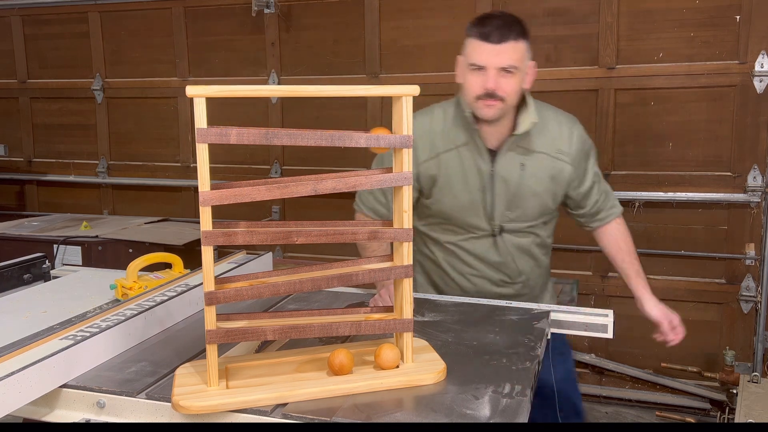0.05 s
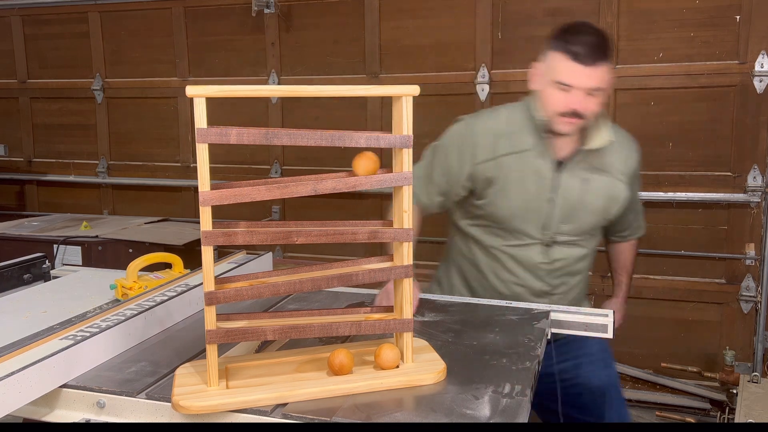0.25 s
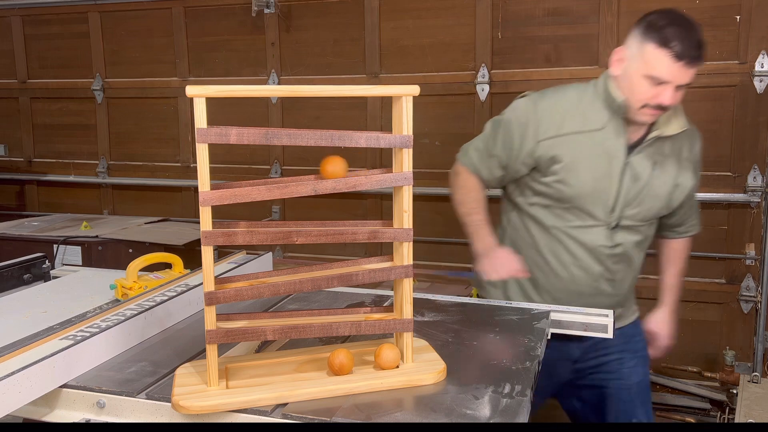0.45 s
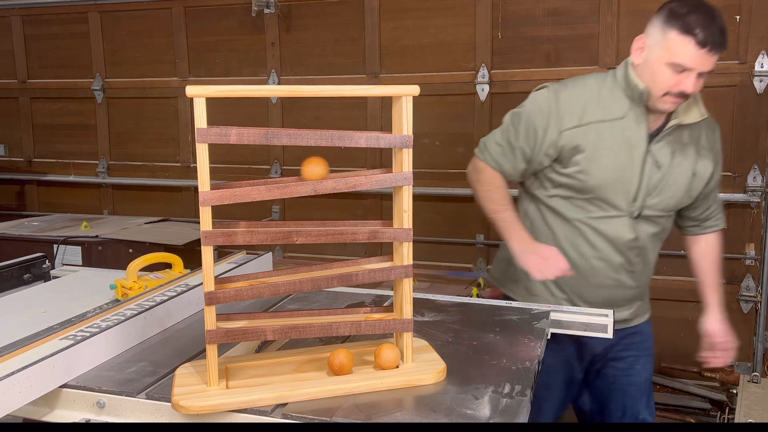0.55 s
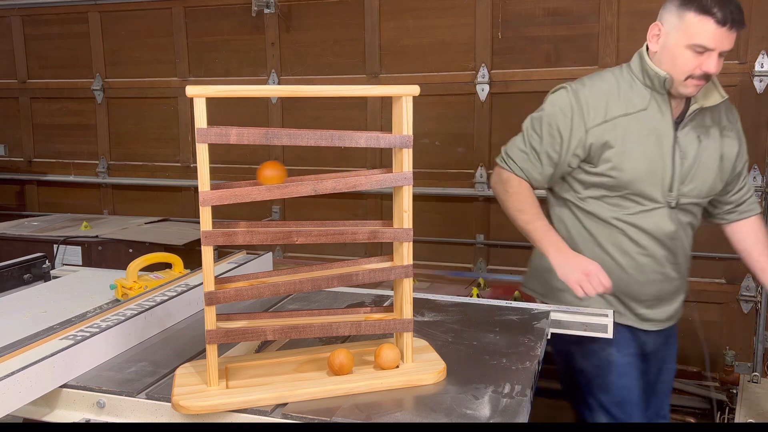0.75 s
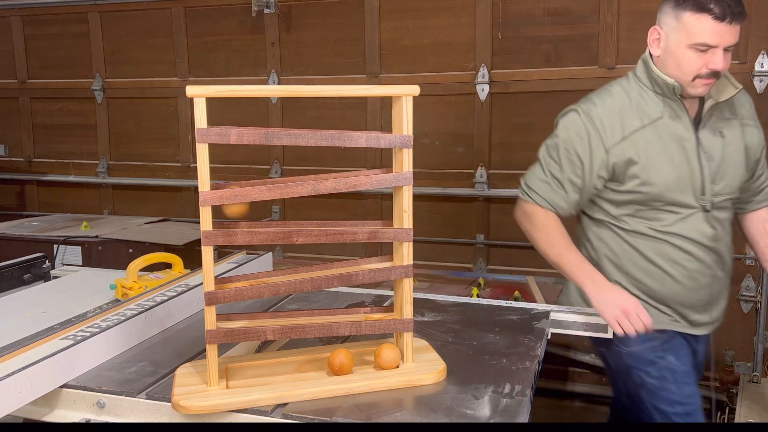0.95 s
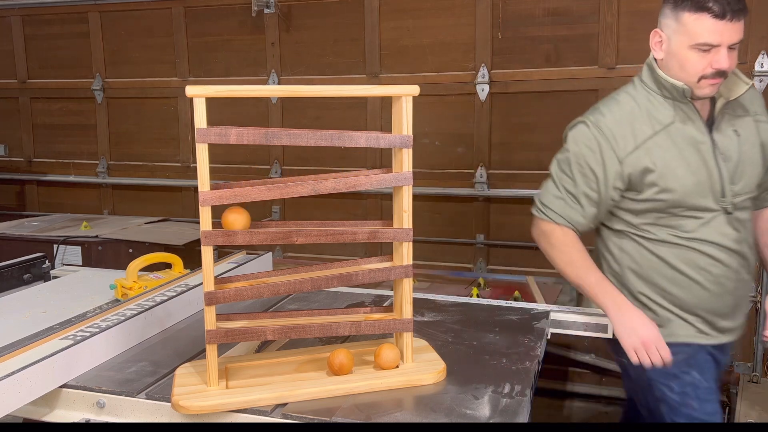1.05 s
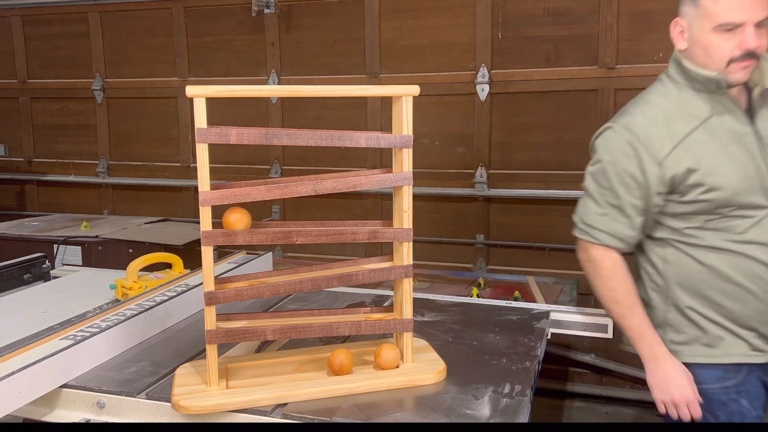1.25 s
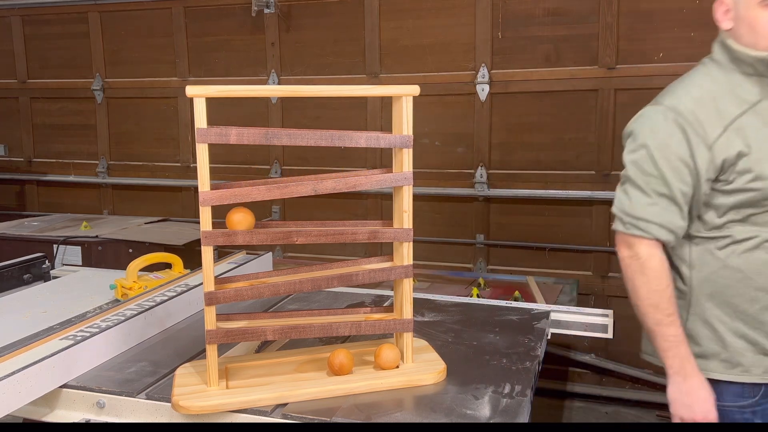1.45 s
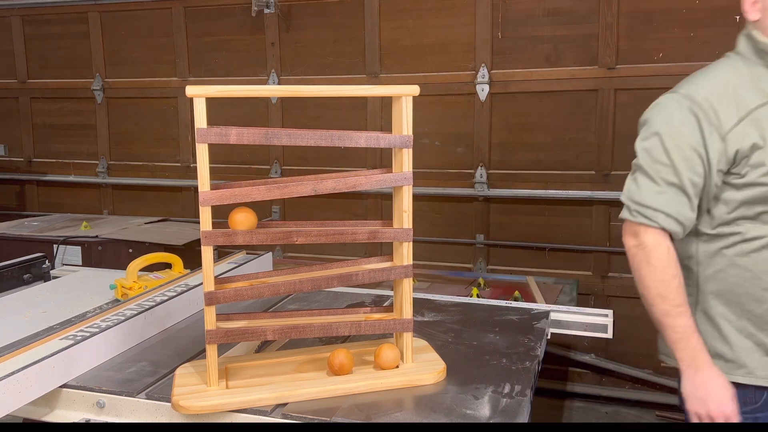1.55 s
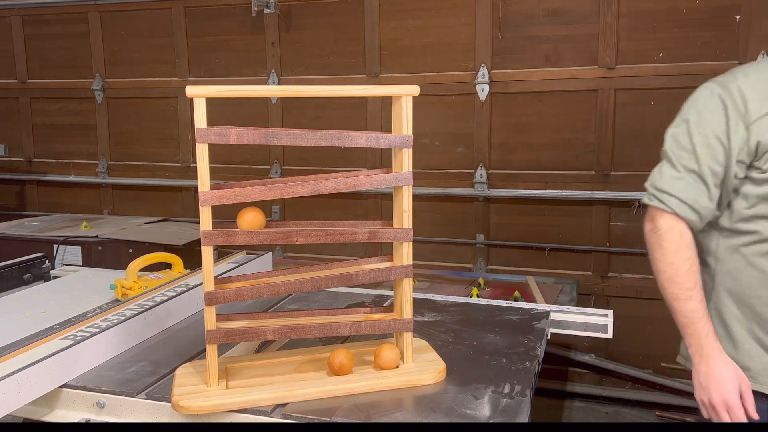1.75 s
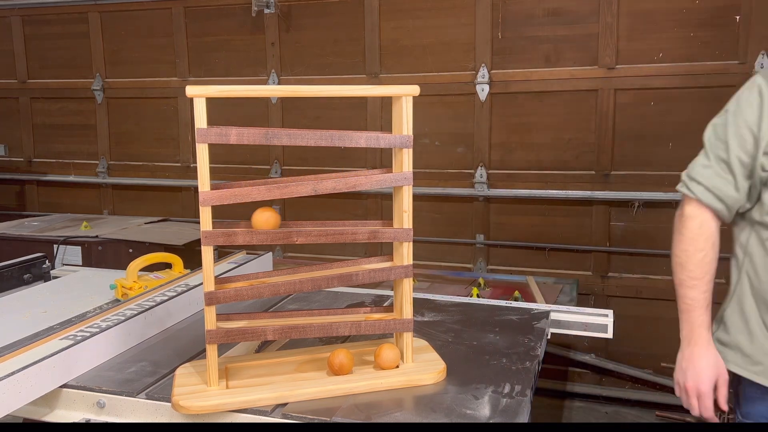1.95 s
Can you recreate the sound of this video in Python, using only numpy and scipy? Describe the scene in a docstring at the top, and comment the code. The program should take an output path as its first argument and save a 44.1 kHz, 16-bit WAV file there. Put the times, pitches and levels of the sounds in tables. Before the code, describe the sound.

A wooden ball drops onto a wooden ramp with a loud ringing knock, rolls almost silently, then gives two quick knocks lower down; clothes rustle and faint ticks follow in a garage, with a close, overloading microphone.

```python
"""A wooden ball drops onto a toy tower's ramps in a garage: each knock rings a wooden part's modes as decaying
sines, with filtered noise for its dense overtones, near-wall echoes and the diffuse room. Between knocks
the ball rolls almost silently, as faint rough noise. Small contacts tick and thump, clothes rustle in grainy
noise as someone steps away, and stirred air rumbles under a steady room tone. The loudest peaks overload
the microphone, as a soft limit that flattens them."""
import sys
import numpy as np
from scipy import signal
from scipy.fft import rfft, irfft, next_fast_len
from scipy.io import wavfile
from scipy.ndimage import map_coordinates

SR = 44100
rng = np.random.default_rng(int(sys.argv[2]) if len(sys.argv) > 2 else 0)


def to_wav(sig):
    """Store sig (one row per channel, or 1-D mono) as 16-bit WAV at the path in sys.argv[1].

    Samples outside -1..1 are clipped; the rate is SR.
    """
    pcm = np.clip(np.atleast_2d(sig), -1, 1) * 32767
    pcm = np.round(pcm).astype(np.int16)
    wavfile.write(sys.argv[1], SR, pcm.T)  # frames by channels


N = 88200
ATTACK_S = 0.00049  # time constant of every blow's rise

# Modes of each struck part, named by the list of knocks.
# Each row: frequency in Hz, relative level in dB, t60 of the tail in s.
TOP_RAMP = [(289, -5.5, 0.37), (589, -11.5, 0.34), (897.5, 0, 0.33), (915, -1, 0.26), (975, -11.5, .25),
            (1857, -15.5, 0.22)]
UPPER_RAMP = [(267.2, -18, 0.52), (682.7, 2, 0.63), (1013, -2, 0.43), (1110, -3, 0.75), (1204, 0, 0.67),
              (1420, -10.5, .22), (1663, -8, .3), (1617, 0.5, .38), (1690, -13.5, 1), (2236, -0.5, .12),
              (2242, 0.5, 0.058), (2420, -16.5, 0.58), (3013, -9.5, 0.36), (3236, -20, 0.67),
              (3820, -15, .3), (5235, -23, .33), (6070, -22, 0.45), (7770, -31, .35)]
POST = [(827, -14, 0.039), (1368, 0.5, 0.031), (2127, 0, 0.03)]
LOWER_RAMP = [(558.4, -12, 0.83), (843, -9, 0.62), (899, -4.5, 0.57), (1142, -5, 0.92), (1191, 2, 0.79),
              (1278, -6, 0.3), (1300, -14, 0.58), (1675, -9.5, 0.87), (1716, -3.5, 0.7), (2098, -15, 0.12),
              (2731, -2.5, 0.24), (3450, -16, 0.49), (4183, -11, 0.35), (4570, -30.5, 0.45)]
# Spectrum of each part's dense overtones. Each row: frequency in Hz, relative density in dB per Hz.
TOP_COLOUR = [(59, -50), (100, -13.5), (220, -15), (286, -7), (755, -2.5), (909, 0.5), (1690, -21),
              (4000, -50), (5200, -76), (8800, -120)]
UPPER_COLOUR = [(35, -51.5), (70, -23.5), (115, -19), (160, -34), (270, -13), (400, -25), (540, -16.5),
                (690, -9), (870, -17), (1050, -8), (1650, -7), (1950, -16.5), (2300, -13), (2680, -25),
                (3000, -13), (3500, -24.5), (4500, -26), (5800, -30.5), (6400, -36), (10000, -47.5),
                (16000, -69)]
POST_COLOUR = [(40, -63.5), (150, -32), (350, -16.5), (530, -13.5), (650, -19), (830, -6), (1000, -9),
               (1380, -1), (1750, -6.5), (2130, -6.5), (2450, -17.5), (3200, -26.5), (7500, -44.5),
               (15000, -67)]
LOWER_COLOUR = [(35, -41), (95, -20), (170, -18), (285, -11), (410, -19.5), (560, -13), (700, -11),
                (870, -2), (1000, -9), (1300, -5.5), (1650, -7), (1850, -12), (2700, -13), (3600, -19.5),
                (5800, -31), (7200, -34), (10000, -49.5), (16000, -76)]


def amp(db):
    """Amplitude ratio of a level: 20 dB for each factor of ten."""
    return 10 ** (np.asarray(db) / 20)


def unit(x):
    """Normalisation of a signal to rms 1."""
    return x / np.sqrt(np.mean(x ** 2) + 1e-20)


def along(points, hz):
    """Interpolation of (Hz, value) points on a logarithmic frequency axis."""
    f, v = np.transpose(points)
    return np.interp(np.log(hz + 1), np.log(f + 1), v)


def filtered(x, response):
    """Linear filtering: the spectrum times a response of frequency, zero-padded against wrap-around."""
    m = next_fast_len(N + SR // 2)
    hz = np.fft.rfftfreq(m, 1 / SR)
    return irfft(rfft(x, m) * response(hz), m)[:N]


def noise(colour):
    """Spectral shaping of white noise into a given colour, at rms 1."""
    return unit(filtered(rng.standard_normal(N), lambda hz: amp(along(colour, hz))))


def clock():
    """Time axis: seconds at each sample."""
    return np.arange(N) / SR


def later(x, s):
    """Pure delay by s seconds."""
    return np.pad(x, (max(round(s * SR), 0), 0))[:N]


def wobble(rate):
    """Band-limited random modulation: a smooth curve through random knots, rate of them a second."""
    return map_coordinates(rng.standard_normal(2000), [clock() * rate], mode="wrap")


def struck(attack, t60):
    """Impulsive excitation of a damped body: a quick rise, then exponential decay."""
    return (1 - np.exp(-clock() / attack)) * amp(-60 * clock() / t60)


def air():
    """Low-frequency pressure fluctuation: steady room tone, rumbling draughts and slow swells."""
    # Spectra. Each row: frequency in Hz, relative density in dB per Hz.
    floor_colour = [(30, -2), (60, -4.5), (120, -2.5), (200, -5), (350, -4), (600, -13.5), (850, -10.5),
                    (1200, -17.5), (2000, -23), (4000, -25), (8000, -32), (12000, -36), (16000, -50.5)]
    draught_colour = [(8, 6.5), (18, -8), (36, -7.5), (55, -17.5), (90, -25), (200, -47), (600, -95)]
    swell_colour = [(1, -0.5), (3.5, -0.5), (7, 7.5), (14, -15.5), (40, -63.5), (100, -120)]
    # Level of the draughts' rumble. Each row: time in s, level in dB.
    draught_level = [(0, -67), (0.19, -31), (0.26, -27.5), (0.42, -33), (0.6, -40.5), (0.749, -55),
                     (1.019, -68.5), (1.15, -41.5), (1.4, -40.5), (1.6, -43), (1.9, -50.5), (1.97, -35)]
    floor_db, swell_db = -56.5, -29.5

    draught = amp(np.interp(clock(), *np.transpose(draught_level))) * noise(draught_colour)
    swells = amp(swell_db) * noise(swell_colour) * signal.windows.tukey(N, .1)  # faded at both ends
    return amp(floor_db) * noise(floor_colour) + draught + swells


def clothes():
    """Friction of fabric: coloured noise with random fast grain, in soft Gaussian swells."""
    # Brushes of cloth. Each row: centre in s, full width at 1/e in s, level in dB.
    rustles = [(0.054, .11, -53.5), (0.195, 0.14, -51), (.44, 0.2, -49), (1.388, 0.22, -55.5),
               (1.706, 0.049, -57), (1.912, 0.14, -58.5), (1.97, .05, -54.5)]
    # Spectrum of the fabric. Each row: frequency in Hz, relative density in dB per Hz.
    cloth_colour = [(300, -4), (1500, 3), (2800, -1), (4500, -1), (7000, -9.5), (10000, -17.5),
                    (15000, -36)]
    grain_db = 2

    t = clock()
    level = np.zeros(N)
    for s, width, db in rustles:
        level += amp(db) * np.exp(-(2 * (t - s) / width) ** 2)
    grainy = amp(grain_db * wobble(330)) * noise(cloth_colour)
    return level * unit(grainy)


def rolling():
    """Rolling over a rough surface: low murmuring noise, its level modulated by the grain of the ramp."""
    # Rolls of the ball. Each row: start in s, end in s, level before the roughness in dB.
    rolls = [(0, 0.209, -44), (.3, 0.928, -53.5)]
    # Spectrum of the rolling. Each row: frequency in Hz, relative density in dB per Hz.
    roll_colour = [(60, -2.5), (180, -8), (300, -0.5), (500, -7.5), (900, -8.5), (1400, -19.5), (3000, -43),
                   (8000, -51.5)]
    rough_db = 2.5

    t = clock()
    level = np.zeros(N)
    for start, end, db in rolls:
        fade_in = np.clip((t - start) / .005, 0, 1)
        fade_out = np.clip((end - t) / .02, 0, 1)
        level += amp(db) * fade_in * fade_out
    return level * amp(rough_db * wobble(45)) * noise(roll_colour)


def room(wash):
    """Diffuse reverberation: each band of the wash decays at its own rate after a short delay and build-up."""
    # Reverberation of the garage. Each row: frequency in Hz, t60 in s.
    decay = [(100, 0.93), (260, 0.63), (700, 0.74), (1500, 0.71), (3000, 0.62), (5000, 0.55), (8000, .4),
             (13000, 0.5)]
    delay_s, build_s = .004, 0.0032

    hz, t, z = signal.stft(wash, SR, nperseg=256)
    t60 = along(decay, hz)[:, None]
    tail = signal.istft(z * amp(-60 * t / t60), SR, nperseg=256)[1][:N]
    return later(tail * (1 - np.exp(-clock() / build_s)), delay_s)


def taps():
    """Damped impacts without resonance: ticks, scuffs and dull thumps as bursts of band-limited noise."""
    # Small contacts. Each row: start in s, level in dB, lower and upper band edge in Hz, t60 in s,
    # room level relative to the tap in dB.
    contacts = [(1.077, -25, 45, 95, 0.054, -16), (1.375, -38, 97.5, 255, .06, -16.5),
                (1.636, -42, 1305, 2150, 0.061, -6.5), (1.685, -44, 1181, 2380, 0.094, -12),
                (1.719, -33, 294, 2090, 0.036, -11.5), (1.755, -52.5, 8850, 11400, .015, -27),
                (1.964, -26.5, 180, 360, 0.027, -22)]

    out = np.zeros(N)
    for s, db, low_hz, high_hz, t60, room_db in contacts:
        def band(hz):
            low_cut = 1 + (low_hz / (hz + 1)) ** 4
            high_cut = 1 + (hz / high_hz) ** 7
            return (low_cut * high_cut) ** -.5

        hit = unit(filtered(rng.standard_normal(N), band)) * struck(ATTACK_S, t60)
        wash = unit(filtered(rng.standard_normal(N), band))
        out += amp(db) * later(hit + amp(room_db) * room(wash), s)
    return out


def cracks():
    """Hard contact of wood on wood: its brief force excites a bright, quickly damped snap of noise."""
    # Snaps at the start of loud knocks. Each row: start in s, level in dB.
    snaps = [(0.226, 0), (0.9332, -17.5), (1.0129, -12)]
    # Spectrum of the snap. Each row: frequency in Hz, relative density in dB per Hz.
    crack_colour = [(500, -40.5), (1500, -10.5), (2400, 4.5), (3500, -9), (5700, -9), (8000, -29),
                    (15000, -45)]
    t60_s = .022

    out = np.zeros(N)
    for s, db in snaps:
        out += later(amp(db) * noise(crack_colour) * struck(ATTACK_S, t60_s), s)
    return out


def ringing(modes):
    """Modal superposition: damped partials, each wavering on its own, under a brief stronger ring."""
    waver_db, waver_cycles, waver_per_s = 3, .11, 40  # level, phase and knot rate of the waver
    direct_db, direct_t60_s = 3, 0.13  # the wood's own brief ring, over the part that the room sustains

    out = np.zeros(N)
    for hz, db, t60 in modes:
        cycles = hz * clock() + rng.random() + waver_cycles * wobble(waver_per_s)
        level = amp(db + waver_db * wobble(waver_per_s))
        out += level * np.sin(2 * np.pi * cycles) * struck(ATTACK_S, t60)
    return out * (1 + amp(direct_db - 60 * clock() / direct_t60_s))


def knocks():
    """Impact response: each blow excites modes and dense overtones; near walls and the room answer."""
    # Blows of the ball. Each row: start in s, modes, overtone colour, ring level in dB,
    # clatter level in dB, clatter t60 in s, room level in dB.
    blows = [(0.0378, TOP_RAMP, TOP_COLOUR, -34.5, -31, 0.071, -37),
             (0.2240, UPPER_RAMP, UPPER_COLOUR, -16.5, -6, 0.13, -10),
             (0.9327, POST, POST_COLOUR, -6.5, -13.5, 0.031, -15),
             (1.0138, LOWER_RAMP, LOWER_COLOUR, -21, -10, 0.091, -13)]
    # Early reflections. Each row: delay in s, level in dB.
    walls = [(0.0129, -14), (0.019, -19.5), (.029, -22)]

    out = np.zeros(N)
    for s, modes, colour, ring_db, clatter_db, t60, room_db in blows:
        clatter = amp(clatter_db) * noise(colour) * struck(ATTACK_S, t60)
        direct = amp(ring_db) * ringing(modes) + clatter
        echoes = sum(amp(db) * later(direct, delay) for delay, db in walls)
        reverberation = amp(room_db) * room(noise(colour))
        out += later(direct + echoes + reverberation, s)
    return out


def scene():
    """Superposition of all pressures at one microphone."""
    return (knocks() + cracks() + taps() + rolling() + clothes() + air())[None]


def record(dry):
    """Saturation and band limiting: the loudest peaks flatten, then all above the top frequency is removed."""
    clip_top, hardness, top_hz = .95, 10, 16500
    overload = np.abs(dry[0] / clip_top) ** hardness
    flattened = dry[0] / (1 + overload) ** (1 / hardness)
    return filtered(flattened, lambda hz: hz < top_hz)[None]


dry = scene()
out = record(dry)
to_wav(out)
```